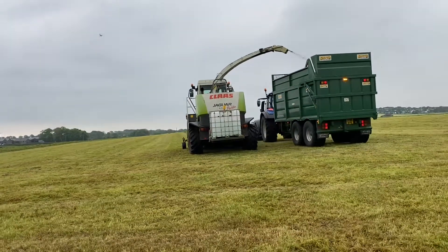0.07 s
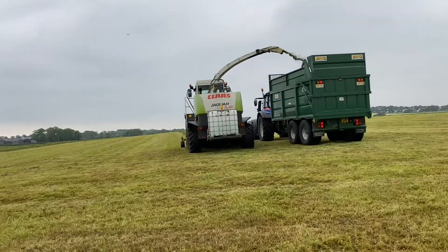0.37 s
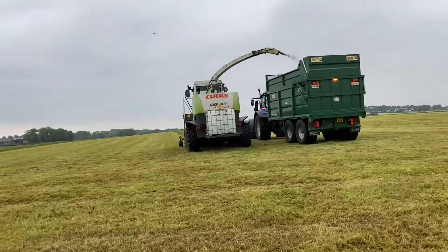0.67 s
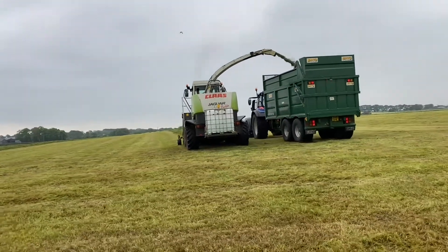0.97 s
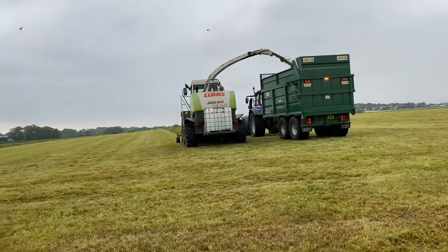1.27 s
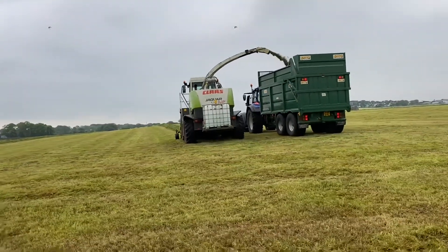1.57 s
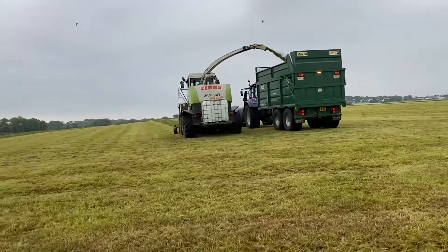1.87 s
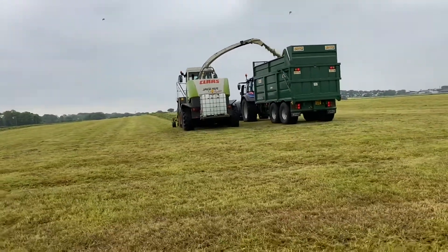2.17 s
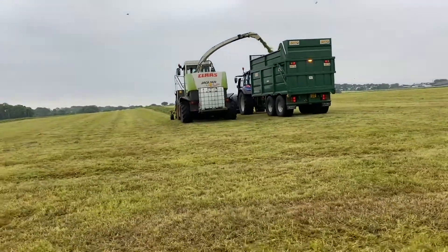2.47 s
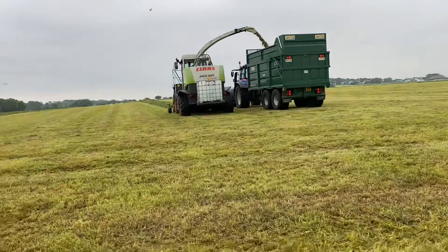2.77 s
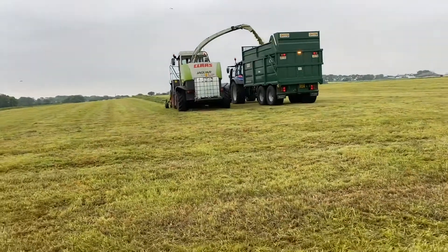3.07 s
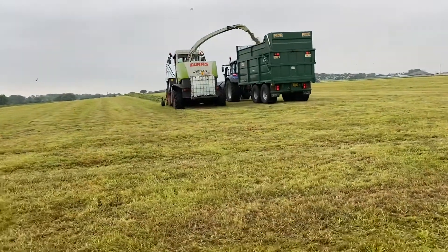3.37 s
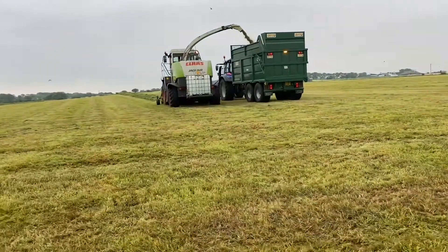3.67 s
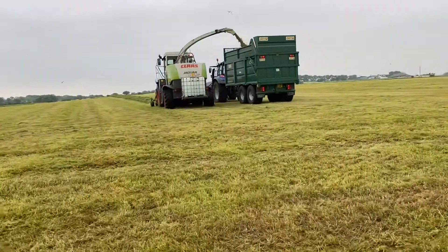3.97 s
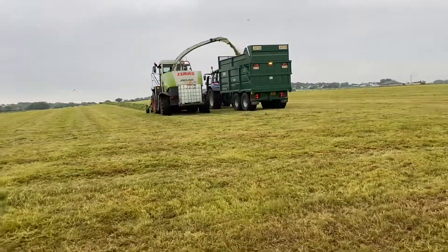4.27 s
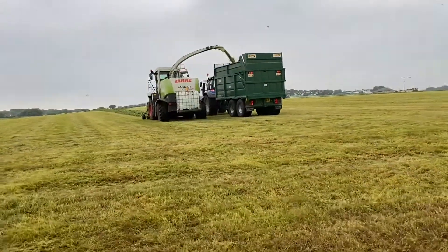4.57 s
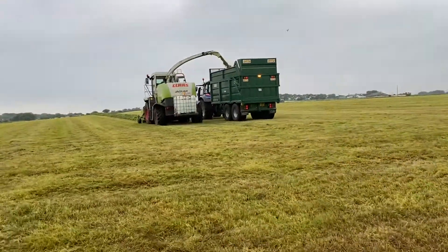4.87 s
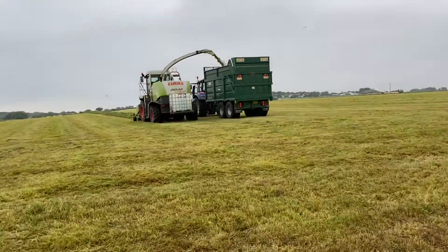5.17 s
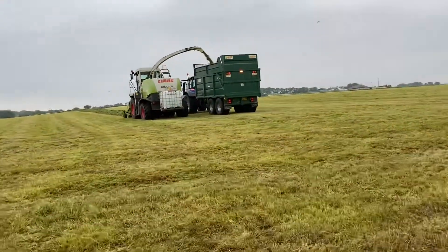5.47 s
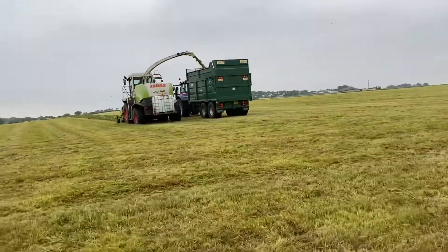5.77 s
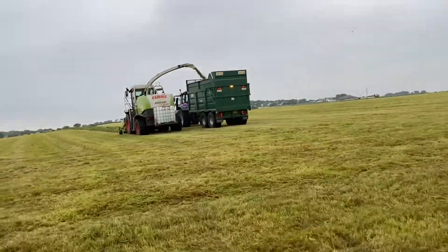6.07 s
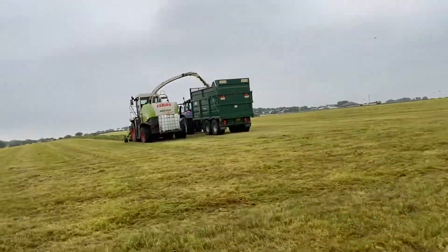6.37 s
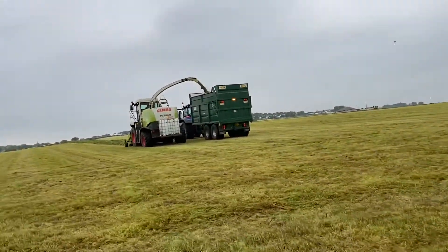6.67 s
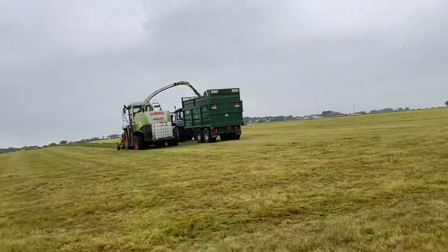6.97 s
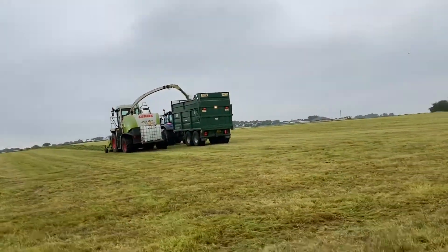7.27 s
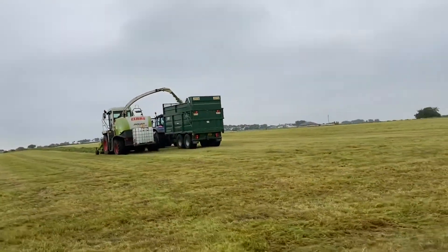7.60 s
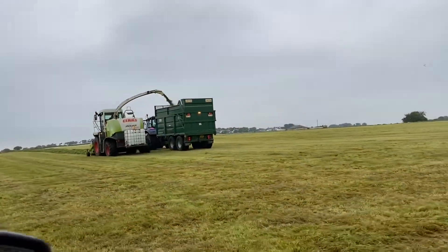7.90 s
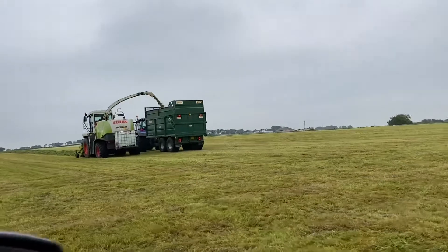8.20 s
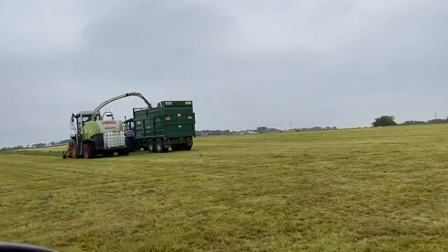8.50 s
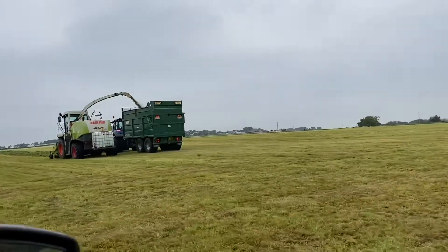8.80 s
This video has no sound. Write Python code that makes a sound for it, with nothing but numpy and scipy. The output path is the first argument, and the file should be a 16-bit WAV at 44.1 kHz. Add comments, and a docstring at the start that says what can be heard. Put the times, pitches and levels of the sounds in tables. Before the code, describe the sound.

A forage harvester and a tractor run continuously in an open field for about nine seconds. From the start there is a low diesel rumble under a hollow chopping roar, with humming knives, whining gears and a wavering blower drone. Around 0.6 seconds the knife hum and gear whine sag in pitch under load, recovering by about 1.2 seconds. From then on, grass hisses up the spout in short, irregular surges, clearest near 1.2, 2.8 and 5 seconds. From 2 seconds wind rumbles on the stereo microphone, with gusts and sharp thumps clustered around 2 to 2.6, 3.5 to 4.4, 5.3 to 5.8 and 7 to 7.5 seconds. From about 4 seconds the machines drift left and the roar gradually dulls, while a thin whistle emerges, strongest just after 6 seconds. Machinery and wind carry on to the end.

```python
"""A forage harvester chops grass and blows it into a tractor's trailer, moving off across an open field.
From the start the machines rumble low; knives, gears, diesels and blower hum in a hollow roar.
At 0.6 s a thick lump of grass drags the knife drum down; from 1.2 s slugs hiss up the spout in surges.
From 2 s wind rumbles on the microphone pair, with gusts and sharp buffets.
From about 4 s the machines drift left; the roar dulls as they turn aside."""
import sys
import numpy as np
from scipy import signal
from scipy.fft import rfft, irfft
from scipy.io import wavfile
from scipy.ndimage import uniform_filter1d

SR = 44100
rng = np.random.default_rng(int(sys.argv[2]) if len(sys.argv) > 2 else 0)


def wav_record(signal):
    """Record a signal, one row per channel, as 16-bit PCM in the file named by sys.argv[1]."""
    frames = np.transpose(np.atleast_2d(signal))
    bounded = np.clip(frames, -1, 1)
    # unit amplitude maps onto the largest positive 16-bit level
    quanta = np.round(bounded * 32767).astype(np.int16)
    wavfile.write(sys.argv[1], SR, quanta)


N = 394254
TIME_S, FFT_HZ = np.arange(N) / SR, np.fft.rfftfreq(N, 1 / SR)
FRAME_S, BIN_HZ = np.arange(N // 256 + 5) * 256 / SR, np.fft.rfftfreq(1024, 1 / SR)

# Machines' bearing: t/s, bearing (0 ahead, 1 left)
BEARING = [(0, 0.042), (1.5, 0.13), (3, 0.036), (4.2, 0.33), (5, 0.23), (5.6, 0.75), (6.4, 0.39),
           (7.1, 0.87), (8, 0.92), (8.94, 1.14)]
# Mic pair response, source ahead and source left: f/Hz, L-R/dB, left lead/rad, coherence (0-1)
MICS_AHEAD = [(120, -0.8, -0.2, 0.97), (550, -1.8, -0.5, 0.97), (820, -3.2, -1.5, 0.95),
              (1050, -5.1, -2.6, 0.56), (1300, -4.9, -5.1, 0.94), (1800, -6.8, -6.0, 0.94),
              (2400, -6.9, -5.3, 0.93), (3200, 0.0, -3.7, 0.8), (4100, 4.8, -4.1, 0.66),
              (5200, 4.3, -5.2, 0.48), (6600, -0.3, -6.2, 0.97), (7500, 0.2, -9.5, 0.93),
              (8700, -0.9, -9.55, 0.95), (11000, 0.0, -12.6, 0.97), (12500, 0.2, -15.0, 0.6)]
MICS_LEFT = [(120, -0.2, 0.2, 0.85), (550, 2.7, 0.4, 0.83), (820, -2.4, -0.8, 0.59),
             (1050, -2.8, -5.3, 0.76), (1300, -3.3, -5.0, 0.95), (1800, -6.2, -4.5, 0.9),
             (2400, -2.5, -3.2, 0.65), (3200, 4.9, -2.1, 0.75), (4100, 12.8, -4.5, 0.52),
             (5200, 9.1, -5.9, 0.73), (6600, 2.0, -7.3, 0.7), (7500, -2.0, -7.4, 0.72),
             (8200, 0.0, -9.4, 0.85), (8900, -0.5, -10.1, 0.85), (11000, 0.0, -12.6, 0.97),
             (12500, 0.2, -15.1, 0.6)]
# Colour the mics' mounting body adds to sound from the left: f/Hz, gain/dB
SIDE_COLOUR = [(1500, -2.5), (1950, 4), (2500, 3.5), (3000, 1.5), (3550, 0), (4000, 1), (4800, 1),
               (5300, 4.5), (6100, -5), (7600, -2), (9500, -2.5)]
# Field reflection cancelling the direct sound: t/s, f/Hz, depth/dB (negative adds)
GROUND_DIP = [(0, 1105, 12), (1.7, 1115, 8), (2.45, 1100, 3), (2.9, 1080, 0), (3.4, 990, -6), (4.5, 930, 1),
              (5.4, 830, 3.5), (7, 840, 4), (7.9, 800, -2), (8.94, 785, -7)]
# Field reflection adding to the direct sound: t/s, f/Hz, height/dB
GROUND_CREST = [(0, 1230, 3.5), (2.6, 1430, 3), (3.7, 1560, 6.5), (4.5, 1520, 0), (4.9, 1220, -1),
                (5.5, 1200, 0.5), (6.3, 1140, 2), (7, 1060, -1), (7.9, 960, 5.5), (8.94, 1010, 5.5)]
# Two treble peaks and a dip, shifting as the mics turn: t/s, f/Hz, height or depth/dB
TREBLE_PEAK = [(0, 3160, 3.5), (1.5, 3180, 5), (2.7, 3200, 6), (4.2, 3300, 1), (5, 3420, 1),
               (6.6, 3530, 4.5), (7.7, 3280, 5.2), (8.94, 3050, 2.5)]
UPPER_PEAK = [(0, 6700, 0), (1.3, 6700, -1), (3, 6700, -2.5), (6.3, 6700, -5.5), (7.3, 7000, 0.5),
              (8.94, 6440, 5)]
TREBLE_DIP = [(0, 4860, -0.5), (3, 4850, 2), (6.3, 4970, 2.5), (7.3, 4770, 3.5), (8.94, 4450, 1)]
# Edge above which the machine's body screens the roar: t/s, f/Hz
ROAR_EDGE = [(0, 2800), (4, 2360), (5.6, 2200), (6.6, 2140), (7.1, 2110), (8.94, 1860)]
# Scattering of tones, growing with distance: t/s, share of full roughness
SCATTER_SHARE = [(0, .35), (3, .6), (6, 1), (8.94, 1)]

# Drum housing boom, cutting roar, spout hiss: f/Hz, relative density/dB
BOOM_SPECTRUM = [(25, -38), (60, -1), (125, 10), (250, -2), (400, -5), (500, -6), (620, 0.5), (750, 1),
                 (900, -9.5), (1200, -6), (2500, -97)]
ROAR_SPECTRUM = [(500, -11.5), (900, -9), (1100, -11.5), (1350, -3.5), (1750, -1), (2300, -1), (2700, -3.5),
                 (3100, -9.5), (4300, -15), (6000, -22.5), (12000, -36)]
HISS_SPECTRUM = [(1500, 3), (3000, 6), (4200, 8.5), (5100, 1), (6200, 3.5), (7000, 5.5), (7700, 8.5),
                 (8600, 2.5), (9500, 5.5), (11000, -1), (12300, -1), (12900, -11), (15500, -41)]
# Their envelopes: t/s, level/dB
BOOM_LEVEL = [(0, -26.5), (.85, -24.5), (1.9, -27.5), (3.1, -28), (3.7, -24.5), (4.5, -28), (5.03, -23.5),
              (5.5, -25.5), (6.4, -26), (7.55, -30), (8.2, -26), (8.94, -26.5)]
ROAR_LEVEL = [(0, -29), (2.3, -29.5), (3, -32.5), (4.6, -31.5), (6.5, -29.5), (7.5, -30), (8.2, -35),
              (8.94, -33.5)]
HISS_LEVEL = [(0, -34), (.4, -33.5), (.95, -28.5), (1.65, -36), (2.2, -32.5), (3.1, -36.5), (4, -33.5),
              (4.6, -39), (5.3, -33), (6.7, -35), (8.94, -31.5)]
# Slugs of grass in the spout: peak t/s, length/s, level/dB
SLUGS = [(1.2, 0.1, -29), (1.44, 0.055, -35), (2.81, 0.091, -28.5), (3.47, 0.1, -31), (3.85, .06, -36),
         (4.19, 0.08, -30.5), (4.84, 0.049, -34), (5.04, 0.16, -28), (5.55, .06, -34), (6.0, .06, -33),
         (6.39, 0.2, -31), (7.16, 0.091, -35), (7.45, 0.088, -39), (7.77, 0.049, -32), (8.47, 0.06, -35),
         (8.79, 0.11, -31)]

# Knife drum speed, sagging under load: t/s, rate/Hz
DRUM_RATE = [(0, 16.95), (.2, 16.92), (.42, 16.05), (.58, 15.88), (.75, 16.02), (.95, 16.64), (1.2, 16.82),
             (1.7, 17.0), (2.15, 16.72), (3.05, 16.92), (4.1, 16.7), (4.55, 16.97), (4.95, 16.63),
             (5.35, 16.94), (6.55, 16.57), (6.8, 16.98), (7.15, 16.7), (7.85, 16.88), (8.94, 16.77)]
# Knife hum, beamed rearwards: t/s, level/dB
KNIFE_LEVEL = [(0, -46), (.14, -36), (.24, -31), (.65, -28.5), (.85, -33), (1.1, -29.5), (1.5, -37),
               (2.1, -34.5), (3.2, -39), (4.6, -39.5), (6, -40), (7.4, -44), (8.2, -36.5), (8.94, -37.5)]
# Knife partials: multiple of drum rate, relative level/dB
KNIFE_ORDERS = [(12, -4), (24, -3), (36, -7.5), (39, -1.5)]
# Gear whine: t/s, tooth-rate level/dB, octave level/dB
GEAR_LEVELS = [(0, -37.5, -38.5), (.5, -45, -46), (1.3, -38, -41.5), (1.9, -41, -41.5), (3, -45.5, -45),
               (4.5, -45, -46), (5.6, -46, -53.5), (6.3, -38.5, -54), (7.3, -42, -57), (7.8, -43.5, -53),
               (8.3, -46, -48), (8.94, -46, -39)]
# Shaft overtones: f/Hz, relative level/dB
WHIRR_SPECTRUM = [(480, 3), (620, 8), (760, 1), (880, -35), (1190, -31), (1350, -2.5), (1900, 0.5),
                  (2150, -18), (2900, -31)]
# Diesel notes: f/Hz, base level/dB
DIESEL_TONES = [(59.2, -80), (118.4, -39), (165, -44), (236.8, -51.5)]
# Their swell with the machines' heading: t/s, gain/dB
DIESEL_SWELL = [(0, 13), (.25, 10.5), (.45, -6), (.95, 9.5), (1.9, 9.5), (3, 4), (4.6, 3), (6.2, 0.5),
                (7.6, -1.5), (8.94, 8)]
# Drive whistle and main blower drone: t/s, level/dB
WHISTLE_LEVEL = [(0, -69), (4, -42), (5.4, -44), (6.3, -37), (7.1, -43), (8.94, -55)]
DRONE_LEVEL = [(0, -42), (1.5, -46), (2.3, -36.5), (3.7, -38), (4.6, -43), (5.6, -49), (6.5, -36),
               (7.5, -39), (8.94, -37)]
# Break-up of the drone by wind: t/s, full roughness (0-1)
DRONE_ROUGHNESS = [(0, 1), (1.8, 1), (2.4, .4), (3.8, .4), (5, .85), (8.94, .8)]
# Blower side tones: f/Hz, base level/dB
BLOWER_TONES = [(332, -43.5), (624, -46), (657, -57.5), (690, -49)]

# Low rumble, machines at first, wind on the mics from 2 s: t/s, level/dB
RUMBLE_LEVEL = [(0, -26), (.5, -28), (.85, -24.5), (1.7, -26), (3.05, -23), (4.3, -27), (4.85, -34),
                (5.3, -25), (5.95, -28.5), (6.5, -23), (6.95, -30), (7.35, -27.5), (7.7, -35), (8.05, -35),
                (8.6, -30.5), (8.94, -29)]
# Low rumble and small-eddy flutter: f/Hz, relative density/dB
RUMBLE_SPECTRUM = [(15, -32), (30, -30), (45, 0.5), (70, 1.5), (130, -3), (200, -14), (300, -14),
                   (500, -37), (1200, -116)]
FLUTTER_SPECTRUM = [(60, -4), (170, -4.5), (270, 2.5), (400, -5), (550, -1.5), (800, -15), (1100, -14.5),
                    (1500, -27), (3000, -69)]
# Gusts: peak t/s, length/s, rumble level/dB, flutter level/dB
GUSTS = [(2.04, 0.21, -20.5, -30.5), (2.24, 0.055, -18.5, -26), (2.61, 0.085, -17, -35),
         (3.57, 0.1, -17, -46), (3.72, 0.037, -16, -35), (3.87, 0.076, -19, -51), (4.03, 0.064, -19, -30),
         (4.08, 0.13, -20, -27.5), (4.26, 0.035, -19, -46), (4.39, 0.16, -17.5, -40),
         (4.72, 0.072, -23, -27.5), (4.98, 0.051, -26, -30), (5.54, 0.1, -26, -26.5),
         (5.715, 0.054, -36, -27), (5.79, 0.07, -21, -31), (6.38, 0.05, -33, -28), (7.0, .06, -32, -28),
         (7.168, 0.053, -23, -19.5), (7.23, 0.075, -24, -25.5), (7.41, 0.064, -23, -35),
         (7.485, 0.07, -20, -35), (8.36, 0.09, -22, -47)]
# Single sharp eddies: t/s, envelope level/dB, nominal f/Hz, decay/cycles
BUFFETS = [(2.014, -6, 231, 0.71), (2.025, -5, 231, 1), (2.051, -5.5, 200, .8), (2.12, -10, 231, 0.73),
           (2.24, -9, 90, 0.56), (2.585, -10, 110, .9), (2.627, -3, 82.6, 0.8), (2.777, -7.5, 130, 0.62),
           (3.044, -7, 120, 0.89), (3.571, -11, 75, 1.4), (3.707, -2, 276, 0.61), (3.873, -10, 110, 1.3),
           (4.017, -5, 89, 0.94), (4.037, -13, 291, 1.2), (4.057, -7.5, 343, 1.9), (4.252, -6.5, 190, 0.7),
           (4.371, -9, 110, 0.76), (4.72, -9.5, 268, 1.5), (4.969, -13, 131, 0.33), (5.266, -10, 231, 0.72),
           (5.307, -4.5, 245, 0.78), (5.399, -14, 298, 0.99), (5.498, -11, 150, 0.65),
           (5.515, -6.5, 306, 1.4), (5.603, -12, 141, 0.7), (5.703, -8.5, 400, 1.4), (5.715, -7, 294, 0.68),
           (5.761, -14, 270, 1.5), (5.784, -11, 296, 1.2), (6.057, -7, 420, 0.42), (6.24, -10, 171, 0.54),
           (6.367, -13, 285, .7), (6.381, -17, 330, 0.57), (6.528, -8, 266, 0.72), (6.861, -12.5, 158, 1.4),
           (7.146, -10.5, 295, 0.95), (7.172, -14, 258, .9), (7.253, -8, 480, .9), (7.273, -13, 130, 0.55),
           (7.402, -11, 240, 0.54), (7.469, -11, 200, 0.45), (7.502, -8, 150, 0.43),
           (7.954, -10, 268, 0.83), (8.346, -11, 81, 1.5), (8.399, -5, 400, 1.26),
           (8.623, -10.5, 480, 0.56), (8.832, -11, 189, .7)]

DRUM_START_HZ = DRUM_RATE[0][1]


def gain_of(db):
    """dB to amplitude."""
    return 10 ** (np.asarray(db) / 20)


def unit_rms(x):
    """Scale to rms 1."""
    return x / np.sqrt(np.mean(abs(x) ** 2) + 1e-20)


def at_time(rows, t_s=TIME_S, col=1):
    """Table column, interpolated in time."""
    rows = np.asarray(rows)
    return np.interp(t_s, rows[:, 0], rows[:, col])


def at_freq(rows, hz, col=1):
    """Table column, interpolated in log frequency."""
    rows = np.asarray(rows)
    return np.interp(np.log(hz + 1), np.log(rows[:, 0] + 1), rows[:, col])


def wander(rate_hz):
    """Slow random drift, rms 1."""
    t_s = TIME_S[::64]
    lowpass = np.exp(-(np.fft.rfftfreq(len(t_s), t_s[1]) / rate_hz) ** 2)
    drift = irfft(rfft(rng.standard_normal(len(t_s))) * lowpass, len(t_s))
    return unit_rms(np.interp(TIME_S, t_s, drift))


def coloured(x, spectrum):
    """Filter by a spectrum table, rms 1."""
    return unit_rms(irfft(rfft(x) * gain_of(at_freq(spectrum, FFT_HZ)), N))


def swell_power(rows, col=2):
    """Summed power of bell-shaped swells."""
    return sum(gain_of(row[col]) ** 2 * np.exp(-2 * np.pi * ((TIME_S - row[0]) / row[1]) ** 2)
               for row in rows)


def throb(turns, depth, decay_turns):
    """Gain pulse, once per drum turn."""
    return unit_rms(1 + depth * np.exp(-(turns % 1) / decay_turns))


def band_db(rows, relative_width=.08):
    """Sliding spectral bell over frames and bins."""
    t_s = FRAME_S[:, None]
    return at_time(rows, t_s, col=2) * np.exp(-((BIN_HZ / at_time(rows, t_s) - 1) / relative_width) ** 2)


def smoothed(field, frames, bins):
    """Box-smoothed time-frequency field, rms 1."""
    return unit_rms(uniform_filter1d(uniform_filter1d(field, frames, axis=0), bins, axis=1))


def mic_pair(hz, t_s):
    """Complex left/right gains and coherence at the machines' bearing."""
    bearing = at_time(BEARING, t_s)
    balance_db, lead_rad, coherence = (
        (1 - bearing) * at_freq(MICS_AHEAD, hz, col) + bearing * at_freq(MICS_LEFT, hz, col)
        for col in (1, 2, 3))
    left = gain_of(balance_db / 2) * np.exp(.5j * lead_rad)
    rms = np.sqrt((abs(left) ** 2 + abs(left) ** -2) / 2)
    return np.array([left, 1 / left]) / rms, np.clip(coherence, 0, 1)


def machine_noise(spectrum, patch_db, ripple_db, treble_cut_db, patch_frames=24, patch_bins=7):
    """Stereo noise, rms 1: quick patches from moving air, slow ripples from reflections."""
    re, im, apart_re, apart_im, patches, ripples = rng.standard_normal((6, len(FRAME_S), len(BIN_HZ)))
    level_db = at_freq(spectrum, BIN_HZ) + patch_db * smoothed(patches, patch_frames, patch_bins)
    level_db += ripple_db * smoothed(ripples, frames=200, bins=5)
    level_db += band_db(GROUND_CREST) + band_db(TREBLE_PEAK) + band_db(UPPER_PEAK)
    level_db -= band_db(GROUND_DIP) + band_db(TREBLE_DIP)
    t_s = FRAME_S[:, None]
    # treble_cut_db: treble lost as the machines turn aside (negative brightens).
    treble = (1 + np.tanh((BIN_HZ - at_time(ROAR_EDGE, t_s)) / 190)) / 2
    level_db += at_time(BEARING, t_s) * (at_freq(SIDE_COLOUR, BIN_HZ) - treble_cut_db * treble)
    gains, coherence = mic_pair(BIN_HZ, t_s)
    left = re + 1j * im
    right = coherence * left + np.sqrt(1 - coherence ** 2) * (apart_re + 1j * apart_im)
    stft = gains * np.array([left, right]) * gain_of(level_db)
    _, noise = signal.istft(stft, nperseg=1024, noverlap=768, time_axis=1, freq_axis=2)
    return unit_rms(noise[:, :N])


def machine_tone(hz, cycles, level_db, roughness, waver_db, blur):
    """Stereo tone through wind; phase blur and scatter grow with distance."""
    gains = np.array([np.interp(TIME_S, FRAME_S, g) for g in mic_pair(hz, FRAME_S)[0]])
    blur_rad = blur * (.7 + .15 * TIME_S) * wander(8)
    share = roughness * at_time(SCATTER_SHARE)
    scattered = np.sqrt(share / 2) * (wander(22) + 1j * wander(22))
    wave = np.exp(2j * np.pi * cycles + 1j * blur_rad) * (np.sqrt(1 - share) + scattered)
    return np.sqrt(2) * gain_of(level_db + waver_db * wander(12.3)) * (gains * wave).real


def chopper(turns, notch_hz=877, notch_width_hz=30, notch_db=-4.5):
    """The drum housing booms, the cut roars; a narrow notch parts them."""
    boom = machine_noise(BOOM_SPECTRUM, patch_db=1.7, ripple_db=1.74, treble_cut_db=-5)
    boom *= gain_of(at_time(BOOM_LEVEL)) * throb(turns, depth=.22, decay_turns=.47)
    roar = machine_noise(ROAR_SPECTRUM, patch_db=1.52, ripple_db=-.77, treble_cut_db=14.5)
    roar *= gain_of(at_time(ROAR_LEVEL))
    notch = np.exp(-((FFT_HZ - notch_hz) / notch_width_hz) ** 2)
    return irfft(rfft(boom + roar) * gain_of(notch_db * notch), N)


def crop_hiss(turns, crossover_hz=6030):
    """Grass hisses through the spout, louder and brighter as the flow thickens."""
    noise = machine_noise(HISS_SPECTRUM, patch_db=1.73, ripple_db=1.5, treble_cut_db=-1.5,
                          patch_frames=11, patch_bins=60)
    rush = irfft(rfft(noise) / (1 + (FFT_HZ / crossover_hz) ** 6), N)
    fizz = noise - rush
    stream = gain_of(at_time(HISS_LEVEL) + .62 * wander(19))
    flow = np.sqrt(stream ** 2 + swell_power(SLUGS)) * gain_of(wander(48))
    surge = flow / flow.mean()
    hiss = flow.mean() * (rush * np.sqrt(surge) + fizz * surge)
    return hiss * throb(turns, depth=.16, decay_turns=.033)


def knives(turns):
    """Knives passing the shear bar hum at multiples of the drum rate."""
    return sum(machine_tone(order * DRUM_START_HZ, order * turns, at_time(KNIFE_LEVEL) + db,
                            roughness=.08, waver_db=1.8, blur=.4) for order, db in KNIFE_ORDERS)


def gears(turns, order=78.3):
    """Gearbox whine, locked to the drum and sagging with it."""
    return sum(machine_tone(k * order * DRUM_START_HZ, k * order * turns, at_time(GEAR_LEVELS, col=k),
                            roughness=.55, waver_db=3, blur=.64) for k in (1, 2))


def shaft_whirr(turns, re_roar_db=-4, blur_rad=.5):
    """Rattle repeating each turn: a dense comb of overtones, blurred by wind."""
    orders = np.arange(28, 172)
    hz = orders * DRUM_START_HZ
    amplitudes = gain_of(at_freq(WHIRR_SPECTRUM, hz) + 3.5 * rng.standard_normal(len(hz)))
    partials = amplitudes * np.exp(2j * np.pi * rng.random(len(hz)))
    grid_turns = np.linspace(0, 1, 4096)
    harmonics = np.exp(2j * np.pi * np.outer(orders, grid_turns))
    angle_turns = (turns + blur_rad * wander(3.1) / (2 * np.pi * orders.mean())) % 1
    # One-turn stereo wavetables at the first and last bearing, crossfaded.
    gains = np.concatenate([mic_pair(hz, TIME_S[0])[0], mic_pair(hz, TIME_S[-1])[0]])
    wavetables = ((partials * gains) @ harmonics).real
    first, last = np.array([np.interp(angle_turns, grid_turns, w) for w in wavetables]).reshape(2, 2, N)
    fade = np.clip(at_time(BEARING), 0, 1)
    return unit_rms((1 - fade) * first + fade * last) * gain_of(at_time(ROAR_LEVEL) + re_roar_db)


def diesels(clock_s):
    """Low engine notes, swelling and fading with heading."""
    return sum(machine_tone(hz, hz * clock_s, db + at_time(DIESEL_SWELL),
                            roughness=.03, waver_db=2, blur=.6) for hz, db in DIESEL_TONES)


def blower(clock_s, drone_hz=608, waver_hz=3):
    """Wavering blower drone, plus side tones that are loudest from straight behind."""
    cycles = drone_hz * clock_s + np.cumsum(waver_hz * wander(2.96)) / SR
    drone = machine_tone(drone_hz, cycles, at_time(DRONE_LEVEL),
                         roughness=at_time(DRONE_ROUGHNESS), waver_db=2.5, blur=.5)
    knife_db = at_time(KNIFE_LEVEL)
    beam_db = .24 * (knife_db - knife_db.mean())
    return drone + sum(machine_tone(hz, hz * clock_s, db + beam_db, roughness=.3, waver_db=3, blur=.87)
                       for hz, db in BLOWER_TONES)


def rumble_and_wind(pops_per_s=520, ahead_db=-12.5, turned_db=-3):
    """Machine rumble, then large eddies from 2 s; small eddies pop, more as the mics turn crosswind."""
    rumble_db = at_time(RUMBLE_LEVEL) + 2.5 * wander(10.5)
    flutter_db = rumble_db + ahead_db + (turned_db - ahead_db) * at_time(BEARING)
    rumble_power = gain_of(rumble_db) ** 2 + swell_power(GUSTS)
    flutter_power = gain_of(flutter_db) ** 2 + swell_power(GUSTS, col=3) + wake_power()
    rumble = coloured(rng.standard_normal((2, N)), RUMBLE_SPECTRUM) * np.sqrt(rumble_power)
    sizes = gain_of(np.minimum(rng.exponential(1, (2, N)), 4)) * rng.choice([-1, 1], (2, N))
    pops = sizes * (rng.random((2, N)) < pops_per_s / SR)
    flutter = coloured(pops, FLUTTER_SPECTRUM) * np.sqrt(flutter_power)
    mid = rumble[0] + flutter[0]
    side = gain_of(-11) * rumble[1] + gain_of(-6) * flutter[1]  # small eddies differ more between mics
    return np.array([mid + side, mid - side])


def buffets(rise_s=.0038, slowing=.86, sharpness=1.22):
    """A sharp eddy builds, then gives a push and suck of pressure that slows as it dies."""
    pressure = np.zeros(N)
    t_s = np.arange(-SR // 20, SR // 6) / SR
    for (at_s, db, hz, decay_cycles), sign in zip(BUFFETS, rng.choice([-1, 1], len(BUFFETS))):
        cycles = (t_s - rise_s) * hz  # zero at the envelope's peak
        slowed = np.sign(cycles) * np.log1p(abs(cycles) * slowing) / slowing
        age = cycles / decay_cycles
        envelope = np.where(age < 0, np.exp(-(2 * age) ** 2), np.exp(-abs(age)))
        puff = sign * gain_of(db) * envelope * np.sin(2 * np.pi * sharpness * slowed)
        span = pressure[round((at_s + t_s[0]) * SR):][:len(puff)]
        span += puff[:len(span)]
    return pressure


def wake_power(re_buffet_db=-21, reference_hz=300, delay_s=.008, length_s=.036):
    """Power of the small eddies trailing each buffet; slower buffets shed less."""
    peaks = np.zeros(N)
    for at_s, db, hz, _ in BUFFETS:
        peaks[round((at_s + delay_s) * SR)] += (gain_of(db + re_buffet_db) * hz / reference_hz) ** 2
    t_s = np.arange(-SR // 10, SR // 10) / SR
    return abs(signal.oaconvolve(peaks, np.exp(-2 * np.pi * (t_s / length_s) ** 2), "same"))


def drive_whistle(clock_s, hz=1752):
    """Thin whistle from the drive, emerging by 4 s."""
    return machine_tone(hz, hz * clock_s, at_time(WHISTLE_LEVEL), roughness=.55, waver_db=0, blur=.35)


def scene():
    """Machines in the field, wind at the mics."""
    drum_hz = at_time(DRUM_RATE)
    turns = np.cumsum(drum_hz) / SR
    drive_speed = 1 + .45 * (drum_hz / np.median(drum_hz) - 1)  # sags less than the drum
    clock_s = np.cumsum(drive_speed) / SR
    cutting = chopper(turns) + crop_hiss(turns) + knives(turns) + gears(turns) + shaft_whirr(turns)
    drive = diesels(clock_s) + drive_whistle(clock_s) + blower(clock_s)
    return cutting + drive + rumble_and_wind() + buffets()


def record(dry, limit=.92, cutoff_hz=15700):
    """Gently round off the loudest wind thumps, then low-pass."""
    rounded = dry / (1 + (dry / limit) ** 8) ** (1 / 8)
    lowpass = signal.firwin(511, cutoff_hz, window=("kaiser", 9), fs=SR)
    return signal.oaconvolve(rounded, lowpass[None], "same")


dry = scene()
out = record(dry)
wav_record(out)
```